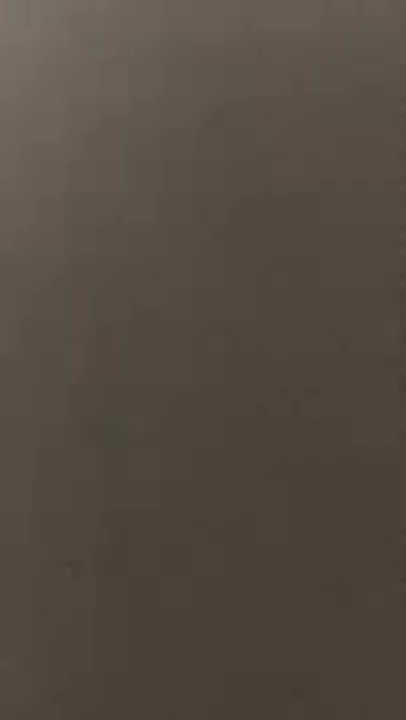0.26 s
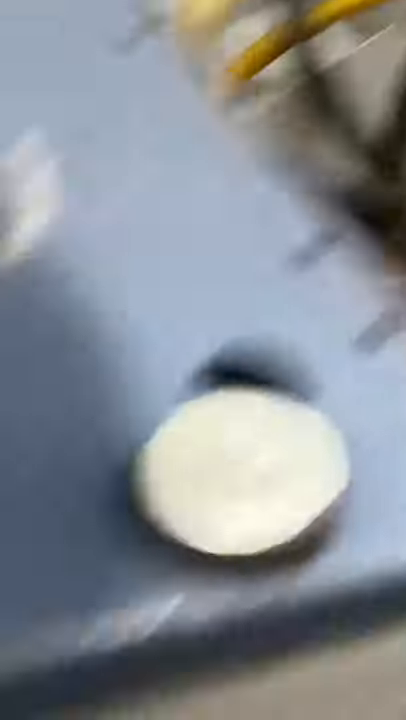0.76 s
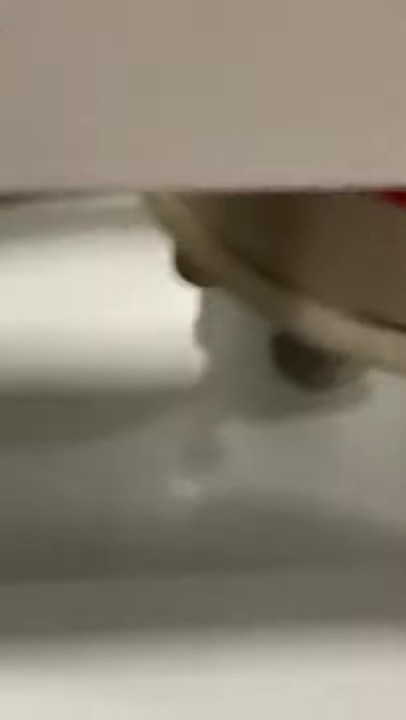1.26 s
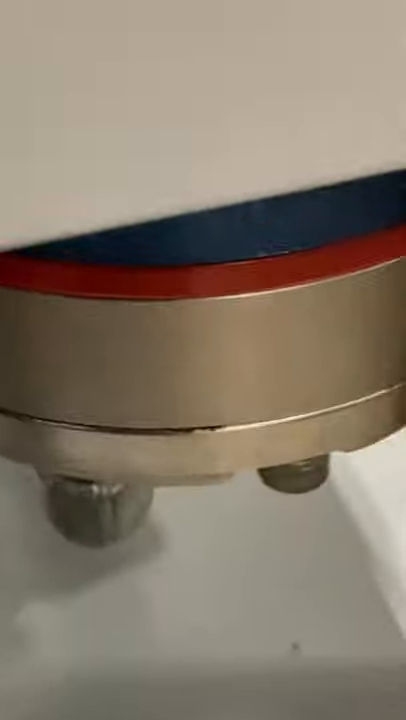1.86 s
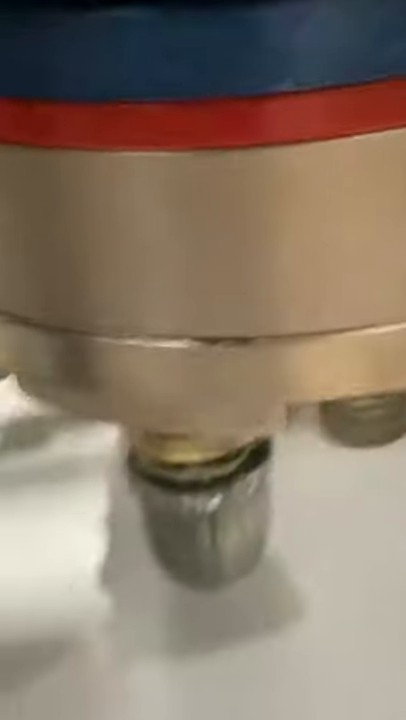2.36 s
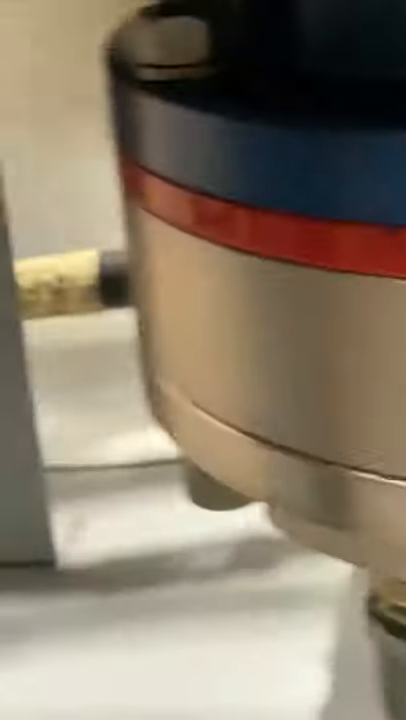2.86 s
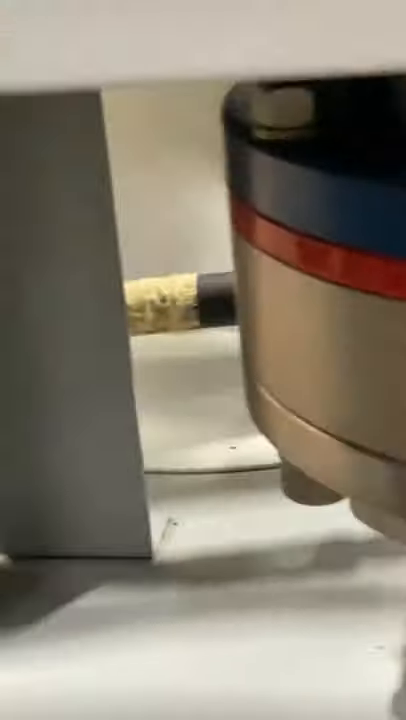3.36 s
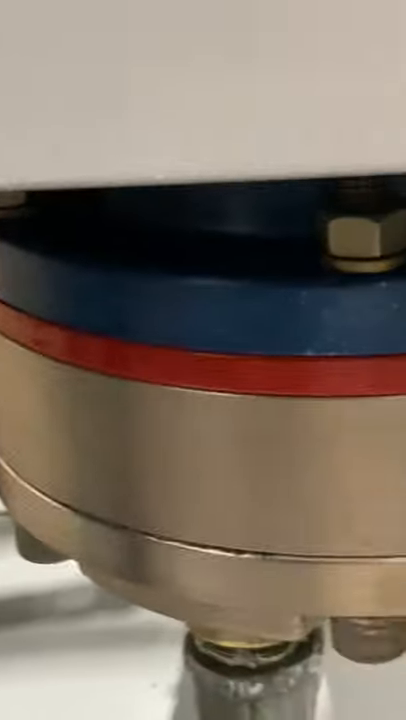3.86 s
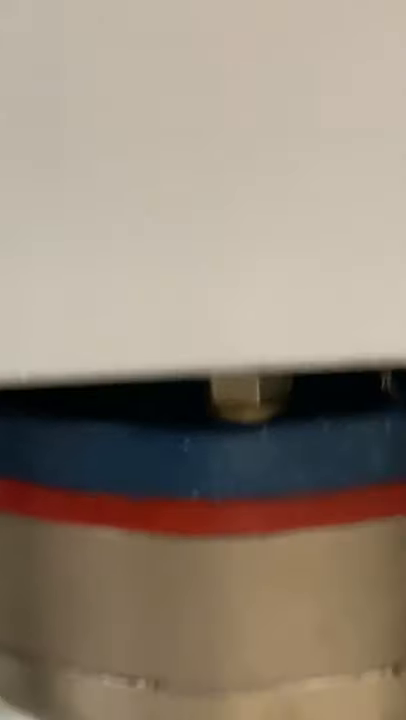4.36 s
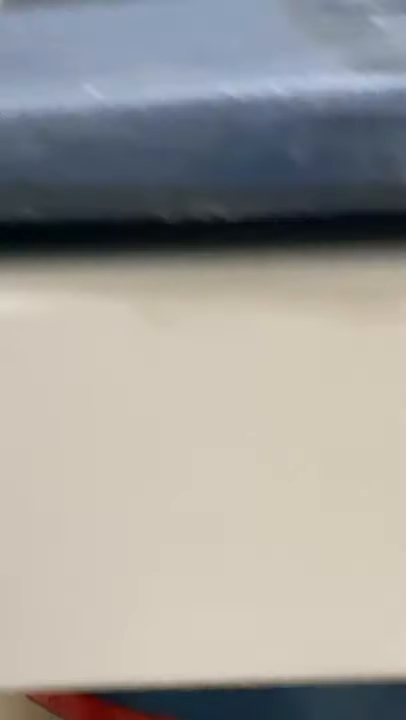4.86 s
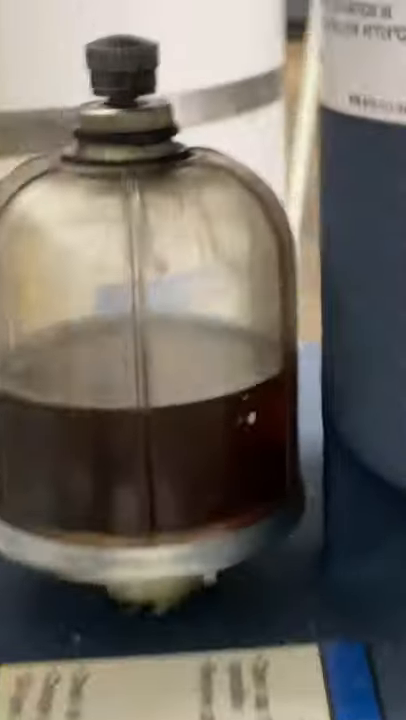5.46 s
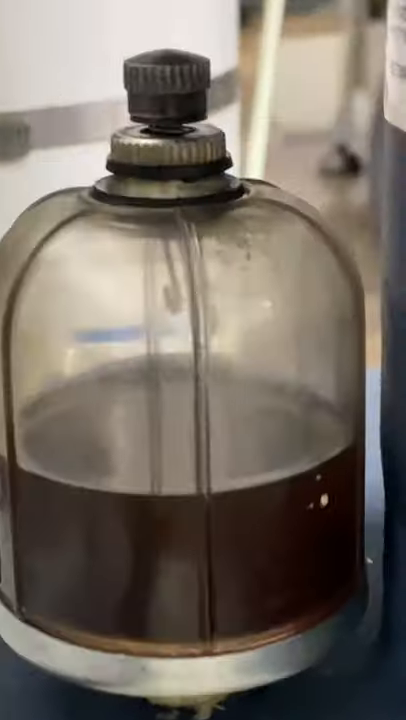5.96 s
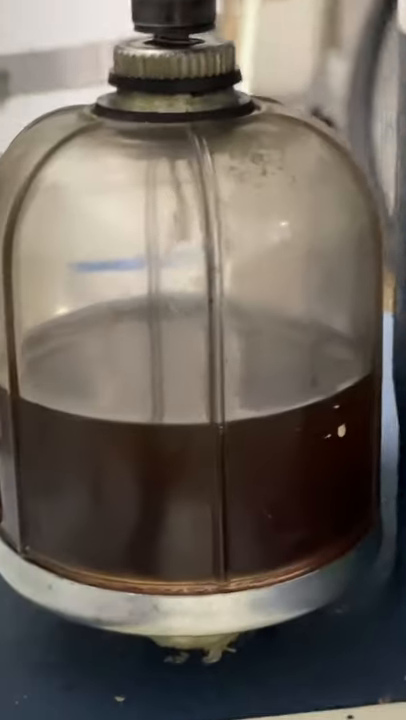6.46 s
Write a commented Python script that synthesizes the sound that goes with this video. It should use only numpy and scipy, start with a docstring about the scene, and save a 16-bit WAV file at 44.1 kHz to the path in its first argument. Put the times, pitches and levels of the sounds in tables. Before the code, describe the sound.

In a machine shop, a motor-driven diaphragm pump runs continuously, a rough low hum with fast fluttering pulses, whirring bearings, rattling valves and soft fluid hiss. Dull thuds and a puff of air hit the handheld microphone in the first half second. Around three seconds the pump strains, throbbing louder with rapid knocks, then returns to its steady run.

```python
"""In a machine shop a three-chamber diaphragm pump runs on an electric motor, heard on a wandering hand-held phone.
First fingers thud on the phone and air buffets it, while the shaft hums as sines on its multiples, valve clicks ring
the casing panels, and shaped noise makes the rumble, body, whirr and hiss. Near 3 s, for about a second, the load
surges: the speed wavers, the pump throbs harder and its once-a-turn knock, faint till then, stands out.
After that it settles back to its steady run."""
import sys
import numpy as np
from scipy import signal
from scipy.fft import rfft, irfft
from scipy.io import wavfile
from scipy.ndimage import uniform_filter1d

SR = 44100
rng = np.random.default_rng(int(sys.argv[2]) if len(sys.argv) > 2 else 0)


def unload_wav(signal):
    """Save mono or channel-first audio to the path in sys.argv[1] as 16-bit WAV at rate SR, clipped to [-1, 1]."""
    wavfile.write(
        sys.argv[1],
        SR,
        np.round(np.clip(np.atleast_2d(signal).T, -1, 1) * 32767).astype(np.int16),
    )


N = 296352


def from_db(db):
    """dB to gain."""
    return 10 ** (np.asarray(db) / 20)


def rms_one(x):
    """Scale to rms 1."""
    return x / np.sqrt(np.mean(x ** 2) + 1e-20)


def in_time(rows):
    """Table columns as one value a sample, the first column being seconds."""
    s, *columns = np.transpose(rows)
    return [np.interp(np.arange(N) / SR, s, c) for c in columns]


def grid_hz():
    """Frequencies of the FFT grid, at least 1 Hz so that the logarithm exists."""
    return np.maximum(np.arange(N // 2 + 1) * SR / N, 1)


def at_hz(points):
    """A table over frequency, interpolated on the FFT grid along log frequency."""
    points = np.array(points)
    return np.interp(np.log(grid_hz()), np.log(np.maximum(points[:, 0], 1)), points[:, 1])


def drift(rate_hz):
    """Slow random wander of spread 1: noise through two equal low-pass poles, one value per 100 samples."""
    r = np.exp(-200 * np.pi * rate_hz / SR)
    slow = signal.lfilter([1], [1, -2 * r, r * r], rng.standard_normal(N // 100 + 2002))
    slow = slow[2000:]  # drop the filter's start
    return np.interp(np.arange(N) / 100, np.arange(len(slow)), rms_one(slow - slow.mean()))


def resonate(x, modes, wander_db):
    """Parallel two-pole resonances, each swelling and fading as the listener moves."""
    out = 0
    for k, (hz, width_hz, level_db) in enumerate(modes):
        r = np.exp(-np.pi * width_hz / SR)
        rung = signal.lfilter([1, 0, -1], [1, -2 * r * np.cos(2 * np.pi * hz / SR), r * r], x)
        gain = from_db(level_db + wander_db * drift(0.27))
        out = out + (-1) ** k * gain * rms_one(rung)
    return rms_one(out)


def noise(colour, patchy_db, source=None):
    """Coloured noise in three interleaved sets of stripes, a sixth of an octave apart, that flicker separately."""
    white = rng.standard_normal(N) if source is None else source
    spectrum = rfft(white) * from_db(at_hz(colour))
    out = 0
    for k in range(3):
        stripe = np.cos(np.pi * (np.log2(grid_hz()) * 2 - k / 3)) ** 2
        flicker_db = patchy_db * (drift(1.96) + 0.87 * drift(19.0))
        out = out + irfft(spectrum * stripe, N) * from_db(flicker_db)
    return rms_one(out)


FADE_S = .09  # a loud spot or a panel comes and goes over this time


def with_swells(rest_db, rows):
    """Gain at rest, plus the power of each stretch that fades in, holds and fades out."""
    t = np.arange(N) / SR
    power = from_db(rest_db) ** 2
    for start_s, end_s, level_db in rows:
        inside = np.clip(np.minimum(t - start_s, end_s - t) / FADE_S + .5, 0, 1)
        power = power + (from_db(level_db) * inside) ** 2
    return np.sqrt(power)


def ticks(turns, count, jitter_s, spread_db, strength_db):
    """One-sample clicks, count a turn, each place in the turn with its own strength."""
    index = np.floor(turns * count).astype(int)
    at = np.flatnonzero(np.diff(index)) + 1
    chance = rng.standard_normal((len(at), 2))
    where = np.clip(at + (chance[:, 0] * jitter_s * SR).astype(int), 0, N - 1)
    out = np.full(N, 1e-18)
    out[where] = from_db(np.array(strength_db)[index[at] % count] + spread_db * chance[:, 1])
    return out


# Colour of the deep rumble. Each row: frequency in Hz, relative density in dB per Hz.
RUMBLE_COLOUR = [(20, -49), (32, -21), (45, -6), (80, -1), (130, -4), (200, -7.5), (300, -50)]


def rumble(rumble_db):
    """Lowest layer: noise strongest round 100 Hz, its stripes flickering."""
    return from_db(rumble_db) * noise(RUMBLE_COLOUR, patchy_db=2.5)


# Colour of the fluid's hiss. Each row: frequency in Hz, relative density in dB per Hz.
HISS_COLOUR = [(3500, -2), (5000, -5.5), (7000, -0.5), (9500, -1.5), (12500, -6), (14300, -3.5),
               (15300, -15.5), (16000, -19.5)]


def hiss(hiss_db, stroke):
    """Fluid hisses: high noise that rises a little with each stroke."""
    return from_db(hiss_db + 11.5 + 0.34 * stroke) * noise(HISS_COLOUR, patchy_db=2.5)


# Narrow bands inside the hiss. Each row: frequency in Hz, width in Hz, relative level in dB.
WHISTLE_BANDS = [(4615, 330, -0.5), (5640, 740, -1.5), (12460, 230, -3.5)]


def whistles(hiss_db, stroke):
    """Breathy whistles: noise through narrow resonances, following the hiss level and the strokes."""
    narrow = resonate(rng.standard_normal(N), WHISTLE_BANDS, wander_db=1.5)
    return from_db(hiss_db + 5.5 + 0.73 * stroke) * narrow


# Air on the swung phone, end values held. Each row: time in seconds, level in dB.
GUST_LEVEL = [(.17, -61), (.25, -40), (.42, -34), (.6, -37), (.72, -51)]


def gust():
    """Air buffets the phone's microphone: low noise made lumpy by a quick random gain."""
    band = signal.butter(2, [60, 480], "band", fs=SR, output="sos")
    low = signal.sosfilt(band, rng.standard_normal(N))
    lumpy = low * from_db(8 * np.tanh(drift(14)))
    return from_db(in_time(GUST_LEVEL)[0]) * rms_one(lumpy)


# Thuds right on the swung phone. Each row: time in seconds, peak level in dB, pitch in Hz.
SHELL_THUDS = [(0.226, -22, 300), (.295, -18.5, 271), (0.338, -28, 330), (0.365, -20, 277.6),
               (.42, -16, 392.3), (.47, -24, 256)]
BUMP_S = .006  # from a thud's peak to 1/e of it


def bumps():
    """Short dull thuds of air and fingers on the phone's shell: tone bursts in bell-shaped envelopes."""
    t = np.arange(N) / SR
    out = 0
    for s, peak_db, hz in SHELL_THUDS:
        envelope = np.exp(-((t - s) / BUMP_S) ** 2)
        out = out + from_db(peak_db) * envelope * np.cos(2 * np.pi * (hz * t + rng.random()))
    return out


# Colour of the pump's body noise. Each row: frequency in Hz, relative density in dB per Hz.
BODY_COLOUR = [(120, -12.5), (230, -4), (420, 1), (640, 2.5), (840, 2.5), (960, -6), (1200, -44)]


def body(body_db, load):
    """Low-middle noise of the pump under its hum, held back slightly as the load grows."""
    return from_db(body_db - 8.5 - 1.5 * load) * noise(BODY_COLOUR, patchy_db=-1.4)


LOCKED_SHARE = .22  # part of the whirr's source power that repeats with every turn


def chatter(turns):
    """Bearings and valve gear repeat one rough pattern each turn; it changes slowly with the listening place."""
    patterns = rng.standard_normal((4, 600))
    steps = np.arange(600) / 600
    locked = sum(drift(.9) * np.interp(turns % 1, steps, pattern, period=1) for pattern in patterns)
    even = rms_one(locked / uniform_filter1d(np.abs(locked), size=4000))  # level out the slow swells
    return np.sqrt(LOCKED_SHARE) * even + np.sqrt(1 - LOCKED_SHARE) * rng.standard_normal(N)


# Colour of the whirr. Each row: frequency in Hz, relative density in dB per Hz.
WHIRR_COLOUR = [(800, -17.5), (1000, -4.5), (1400, -0.5), (2000, 1), (2600, -2.5), (3000, -3), (3270, -7),
                (3450, -6.5), (3800, -9.5), (4200, -9.5), (5000, -19.5), (6500, -22.5)]


def whirr(turns, whirr_db, stroke, load):
    """Coloured chatter that pulses with the flow strokes, more deeply under load."""
    pulsing_db = whirr_db + (1.8 + 2.5 * load) * stroke
    return from_db(pulsing_db) * noise(WHIRR_COLOUR, patchy_db=.6, source=chatter(turns))


SEAT_AT = .07  # place in the turn of the first valve seating
RATTLE_DB = 3.5  # the panels shake unevenly: spread at full load
# Casing panels. Each row: resonance in Hz, width in Hz, level in dB when turned away from the phone.
CASING_PANELS = [(1140, 190, -55), (1330, 220, -55), (1646, 85, -46), (1822, 75, -48), (2180, 80, -50),
                 (2400, 130, -56), (2530, 260, -49), (3320, 260, -62), (4160, 240, -58), (5930, 240, -52)]
# When a panel faces the phone. Each row: start in seconds, end in seconds, panel in Hz, level in dB.
PANEL_FACING = [(.05, .4, 1822, -37), (-.1, .2, 2180, -34), (.14, .43, 1140, -32), (.3, 2.0, 1646, -41),
                (.6, .85, 1822, -38), (1.1, 2.15, 2530, -37), (1.7, 2.1, 2180, -39), (2.1, 2.85, 5930, -45),
                (2.2, 3.05, 1822, -37), (2.2, 3.6, 4160, -45), (2.3, 3.05, 3320, -43),
                (2.2, 4.15, 1646, -37), (3.05, 3.6, 1140, -32), (3.07, 3.6, 1330, -33),
                (3.08, 3.52, 1646, -28.5), (3.07, 3.5, 3320, -36), (3.7, 3.87, 3320, -39),
                (3.1, 3.62, 1822, -32), (3.05, 4.1, 2180, -40), (3.4, 4.1, 2530, -39),
                (4.85, 5.35, 1646, -40), (5.05, 5.8, 1822, -37), (5.1, 5.38, 2400, -34),
                (5.35, 6.6, 4160, -42), (5.4, 6.8, 2180, -36), (5.8, 6.8, 2530, -39)]


def valves(turns, load):
    """Six uneven valve seatings a turn, with the rush of fluid behind them, ring the casing panels."""
    clicks = ticks(turns - SEAT_AT, count=6, jitter_s=.00005, spread_db=2.5,
                   strength_db=[-5, -13, 0, -11, -2, -13])
    rushing = rms_one(clicks) + 0.45 * rng.standard_normal(N)
    out = 0
    for hz, width_hz, away_db in CASING_PANELS:
        facing = [(start_s, end_s, db) for start_s, end_s, at, db in PANEL_FACING if at == hz]
        mode = [(hz, width_hz, 0)]
        ringing = resonate(resonate(rushing, mode, wander_db=0), mode, wander_db=1.2)
        out = out + with_swells(away_db, facing) * ringing * from_db(RATTLE_DB * load * drift(45))
    return out


# Lowest shaft tones. Each row: multiple of the shaft speed, level in dB over the rumble.
LOW_ORDERS = [(2, -16.5), (3, -7.5), (4, -16), (5, -11.5), (6, -9.5), (7, -10)]
# Whine above the hum's multiples 8 to 30: a list of multiples of the shaft speed.
WHINE_ORDERS = [52, 55, 56, 62]
# Loud spots of single tones that the moving phone crosses.
# Each row: start in seconds, end in seconds, multiple of the shaft speed, level in dB.
TONE_SPOTS = [(1.3, 2.3, 6, -43), (2.3, 2.9, 6, -38), (2.9, 3.2, 6, -28), (3.2, 3.55, 6, -33),
              (3.55, 4.0, 6, -29), (4.0, 4.6, 6, -38), (.7, 2.95, 9, -32), (2.95, 3.42, 9, -36),
              (3.44, 3.98, 9, -27), (3.98, 4.4, 9, -35), (4.85, 6.8, 9, -35), (.8, 3.02, 10, -31),
              (3.75, 4.2, 10, -31), (4.2, 5.8, 10, -38), (2.9, 3.4, 11, -32), (3.4, 4.25, 11, -38),
              (2.7, 4.0, 12, -38), (3.4, 3.62, 12, -31), (-.1, 1.15, 13, -37), (4.5, 6.8, 13, -38),
              (5.1, 5.4, 13, -35), (2.85, 3.45, 14, -28), (3.45, 3.8, 14, -32), (1.0, 1.5, 15, -36),
              (2.7, 4.0, 15, -38), (3.4, 3.62, 15, -32), (.55, 1.3, 16, -36), (1.6, 2.85, 16, -35),
              (6.0, 6.8, 16, -37), (.7, 6.8, 18, -38), (5.9, 6.8, 18, -36), (2.4, 4.0, 19, -35),
              (3.2, 3.8, 20, -34), (-.1, .35, 21, -27), (.35, .65, 21, -32), (1.75, 3.15, 21, -35),
              (3.15, 3.85, 21, -27), (3.85, 5.8, 21, -41), (5.8, 6.8, 21, -36), (1.1, 3.0, 22, -35),
              (3.0, 3.4, 22, -28), (3.4, 4.0, 22, -34), (4.2, 4.6, 22, -35), (2.5, 4.0, 23, -36),
              (4.9, 6.8, 24, -36), (3.4, 3.6, 25, -33), (4.95, 6.8, 25, -38), (3.4, 3.6, 26, -33),
              (2.2, 3.4, 27, -40), (3.4, 3.95, 27, -31), (2.0, 3.05, 28, -35), (3.05, 3.45, 28, -27),
              (3.42, 4.0, 28, -36), (4.2, 4.75, 28, -35), (2.9, 3.4, 29, -32), (3.8, 4.2, 29, -35),
              (-.1, .8, 52, -41), (.6, 1.05, 55, -39), (1.05, 4.3, 55, -44), (-.1, .4, 56, -39),
              (.75, 1.9, 56, -37.5), (4.8, 5.3, 56, -35.5), (.3, 1.0, 62, -42), (5.0, 6.3, 62, -43)]
REST_DB = -23  # multiples from 8 up away from their loud spots, over the body
DEEP_AT, THUMP_AT = .7, .9  # place in the turn of the pulse of the deep hum and of the upper hum


def hum(turns, body_db, rumble_db):
    """Sines on the shaft multiples bunch into a pulse each turn, wander, and swell at their loud spots."""
    rests = [(k, rumble_db + db) for k, db in LOW_ORDERS]
    rests += [(k, body_db + REST_DB) for k in [*range(8, 31), *WHINE_ORDERS]]
    out = 0
    for k, rest_db in rests:
        spots = [(start_s, end_s, db) for start_s, end_s, at, db in TONE_SPOTS if round(at) == k]
        gain = np.sqrt(2) * with_swells(rest_db + 3.0 * drift(1.3), spots) * from_db(1.7 * drift(5.0))
        place = DEEP_AT if k < 14 else THUMP_AT
        # the chambers' own multiples, every third, keep closest to the pulse
        start_rad = rng.standard_normal() * (1.7 if k % 3 else .25)
        scatter_rad = start_rad + .5 * drift(.5) + .2 * drift(4)
        out = out + gain * np.cos(2 * np.pi * k * (turns - place) + scatter_rad)
    return out


# What the knock rings. Each row: resonance in Hz, width in Hz, relative level in dB.
KNOCK_RING = [(382, 300, -5), (607, 200, -3), (1100, 350, -8)]
KNOCK_IDLE_DB, KNOCK_FULL_DB = -45, -23  # at no load and at full load


def knock(turns, load):
    """Under load one chamber slams each turn: three strong blows a seventh of a turn apart."""
    clicks = ticks(turns - SEAT_AT, count=7, jitter_s=.0001, spread_db=3.5,
                   strength_db=[0, -12, -20, -9, -20, -2, .5])
    level_db = KNOCK_IDLE_DB + (KNOCK_FULL_DB - KNOCK_IDLE_DB) * load
    return from_db(level_db) * resonate(clicks, KNOCK_RING, wander_db=3.0)


# Shaft speed, dipping and overshooting in the surge. Each row: time in seconds, speed in turns per second.
SHAFT_SPEED = [(0, 29.42), (2.84, 29.43), (3.0, 29.12), (3.16, 29.45), (3.54, 29.9), (3.74, 29.45),
               (3.94, 29.65), (4.44, 29.43), (6.72, 29.42)]
# The surge, end values held. Each row: time in seconds, share of full load.
LOAD_SHARE = [(2.9, .2), (3.08, .72), (3.45, .7), (3.55, .45), (3.9, .25), (4.1, .15)]
# Layers at the phone, before each layer's own trim.
# Each row: time in seconds, rumble in dB, body in dB, whirr in dB, hiss in dB.
LAYER_LEVELS = [(0, -50, -24.5, -29.5, -50.5), (.12, -46.5, -22.5, -30, -44.5),
                (.5, -39, -25.5, -31.5, -47.5), (.9, -53.5, -26, -31, -46), (1.16, -43, -24, -31, -45.5),
                (1.33, -36, -24, -29, -46), (1.7, -35, -24.5, -30.5, -43.5), (2.0, -37, -26, -30, -43.5),
                (2.95, -37.5, -22.5, -30.5, -44.5), (3.15, -33.5, -19.5, -28.5, -43),
                (3.5, -35.5, -20, -27.5, -44), (3.9, -34.5, -21.5, -28, -43.5),
                (4.15, -38, -23.5, -29.5, -48.5), (4.85, -36, -25, -28, -51), (5.0, -37, -26, -30, -47.5),
                (5.6, -35.5, -22.5, -29, -44.5), (6.72, -38.5, -24.5, -30, -44.5)]
KNOCK_AT_S = 3.077  # turns count from here; a knock's last blow comes SEAT_AT of a turn later
THROB_LOW_DB, THROB_HIGH_DB = 2.8, 1.3  # once-a-turn pulse of lows and highs, scaled by the throb


def scene():
    """One shaft angle and one load drive the pump; all sources reach the phone as one field."""
    speed, = in_time(SHAFT_SPEED)
    rumble_db, body_db, whirr_db, hiss_db = in_time(LAYER_LEVELS)
    load = np.clip(in_time(LOAD_SHARE)[0], 0, 1)
    turns = np.cumsum(speed) / SR
    turns = turns - turns[round(KNOCK_AT_S * SR)]
    stroke = np.cos(2 * np.pi * 3 * (turns - SEAT_AT))  # flow pulses three times a turn
    # the whole pump pulses once a turn, harder and later under load
    throb = (.45 + .5 * load ** 2) * np.cos(2 * np.pi * (turns - .65 - .3 * load))

    background = rumble(rumble_db) + hiss(hiss_db, stroke) + whistles(hiss_db, stroke)
    handling = gust() + bumps()
    low = body(body_db, load) + hum(turns, body_db, rumble_db)
    high = whirr(turns, whirr_db, stroke, load) + valves(turns, load)
    pump = from_db(THROB_LOW_DB * throb) * low + from_db(THROB_HIGH_DB * throb) * high + knock(turns, load)
    field = background + handling + pump
    return np.array([field, field])


# Phase between left and right over frequency; the two sides are opposed from 8.3 to 11.5 kHz.
# Each row: frequency in Hz, phase of left relative to right in radians.
SIDE_PHASE = [(1, 0), (300, 0), (860, .1), (1900, .03), (2500, .7), (3700, .15), (4400, 1.0), (5000, 2.3),
              (5510, 1.5), (7240, 2.3), (8300, np.pi), (11500, np.pi), (12000, 3.7), (14400, 4.6),
              (15400, 6.0)]
# Colour between the two sides. Each row: frequency in Hz, left over right in dB.
SIDE_TILT = [(220, 0), (400, -1.3), (1300, .8), (2400, 0)]
# Scattered part, opposite in left and right, that widens the sound; nearly absent from 8.4 to 11.2 kHz.
# Each row: frequency in Hz, level in dB before a 1 dB lift.
SCATTERED_PART = [(60, -46), (150, -42), (330, -18), (800, -9.5), (1380, -10), (1900, -37), (2500, -7),
                  (3700, -13.5), (4500, -8.5), (7000, -7), (8100, -9), (8400, -89), (11200, -52),
                  (11800, -5), (15000, -14.5)]
CUTOFF_HZ = 15740


def record(dry):
    """Stereo from one field: phase and colour differ by side, a scattered part is opposite in each; the top is cut."""
    short = signal.stft(dry[0], nperseg=2048)[2]
    random_phase = np.exp(2j * np.pi * rng.random(short.shape))
    scattered = signal.istft(short * random_phase, nperseg=2048)[1][:N]
    field = rfft(dry[0])
    wide = rfft(scattered) * from_db(at_hz(SCATTERED_PART) + 1.0)
    # each side takes half of the phase and half of the tilt
    half = np.exp(.5j * at_hz(SIDE_PHASE)) * from_db(at_hz(SIDE_TILT) / 2)
    sides = irfft(np.array([(field + wide) * half, (field - wide) / half]), N)
    top_cut = signal.ellip(16, .5, 80, CUTOFF_HZ, fs=SR, output="sos")
    return signal.sosfilt(top_cut, sides)


dry = scene()
out = record(dry)
unload_wav(out)
```